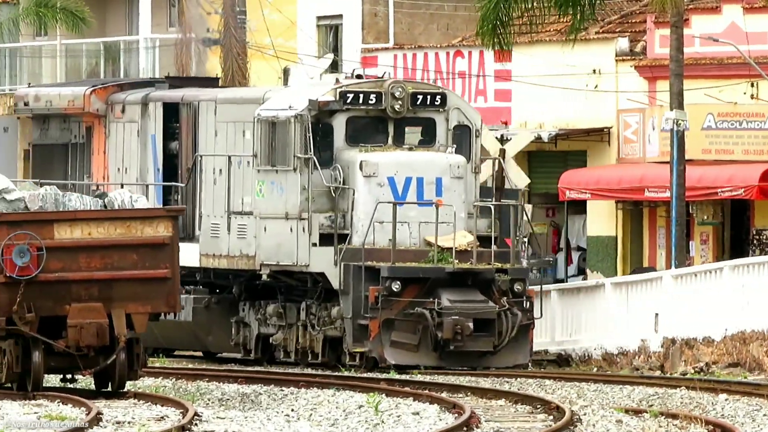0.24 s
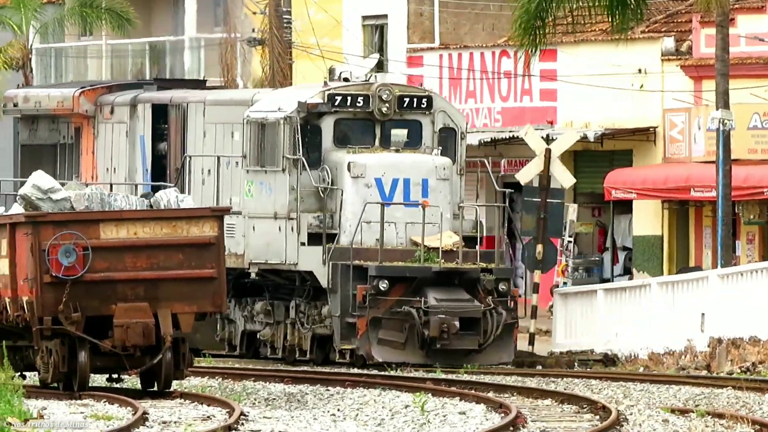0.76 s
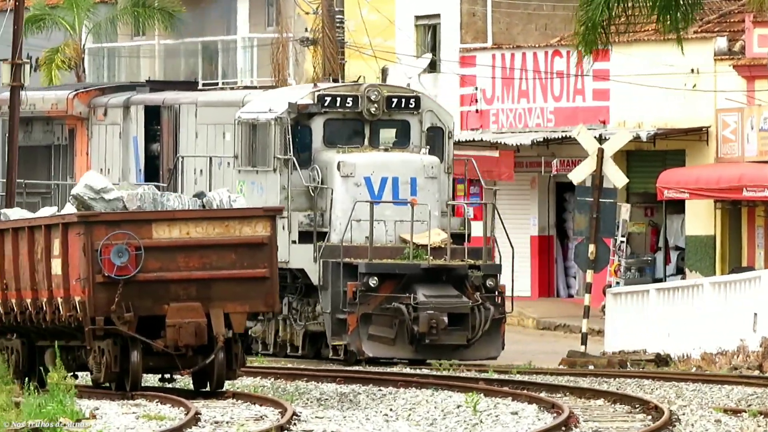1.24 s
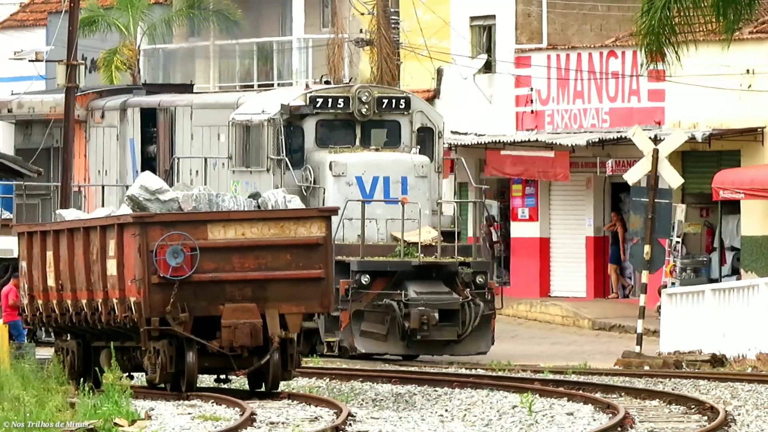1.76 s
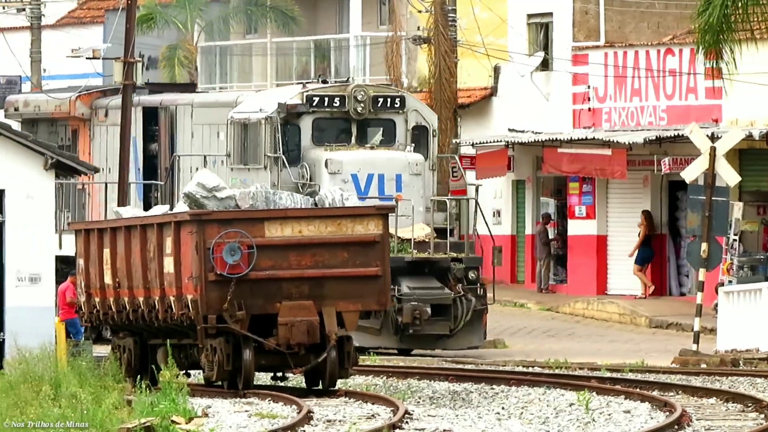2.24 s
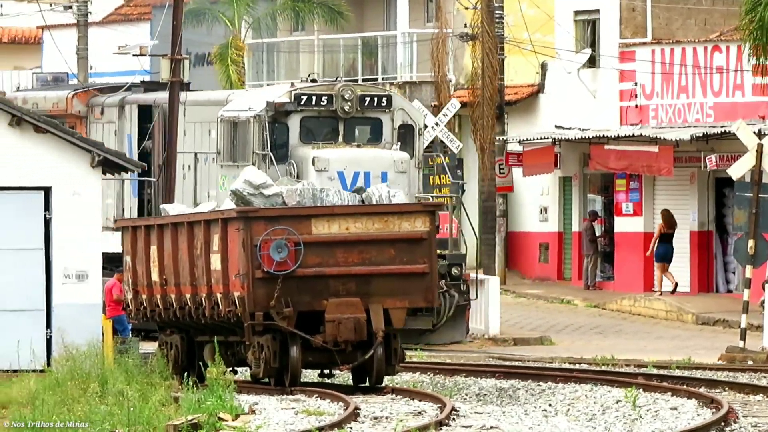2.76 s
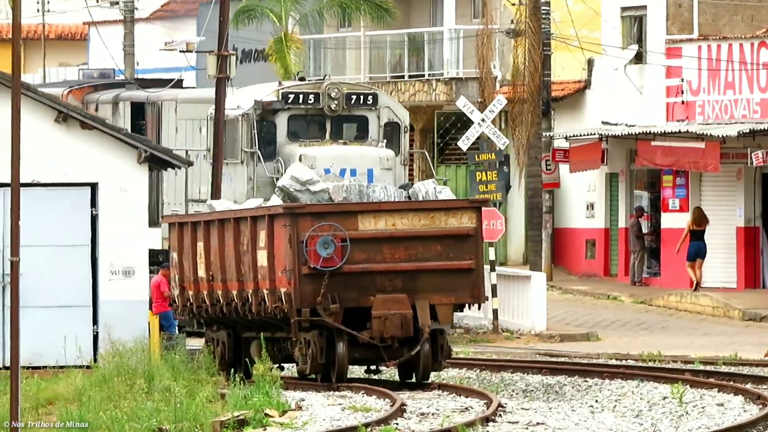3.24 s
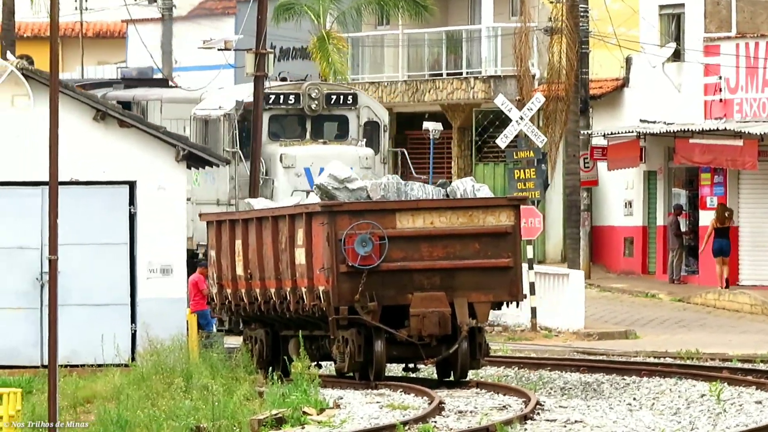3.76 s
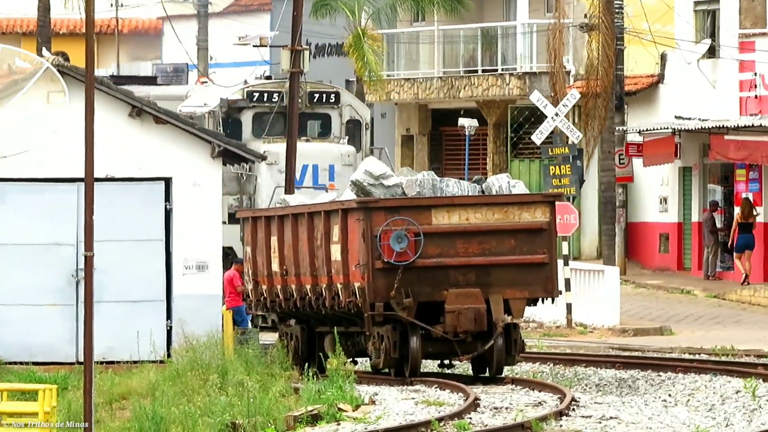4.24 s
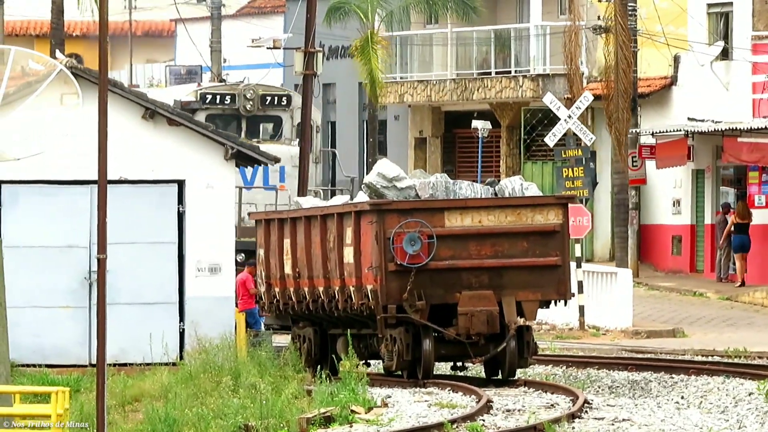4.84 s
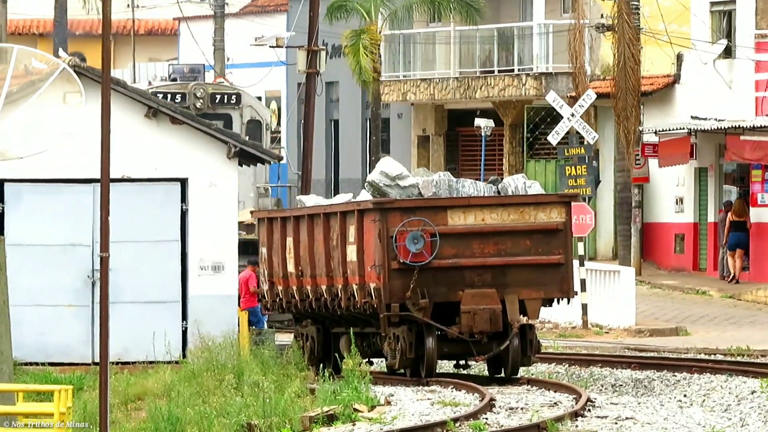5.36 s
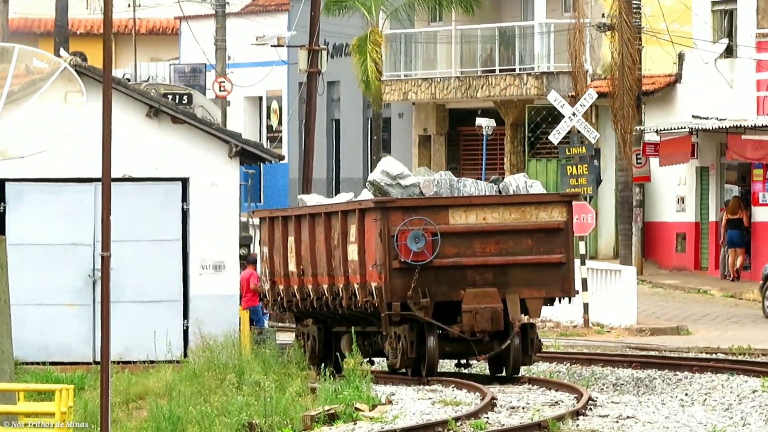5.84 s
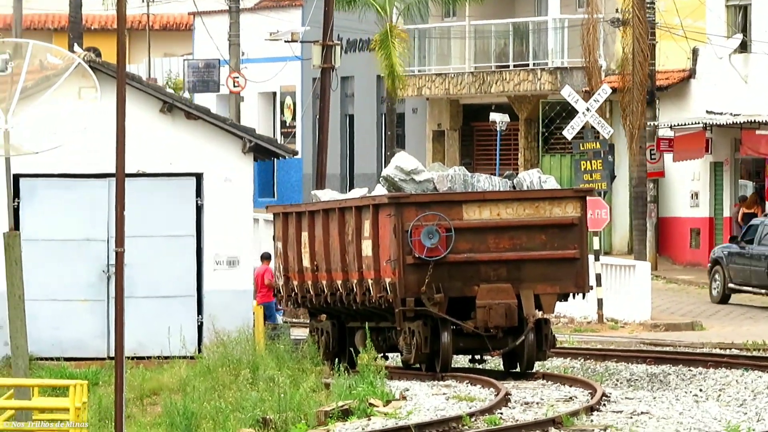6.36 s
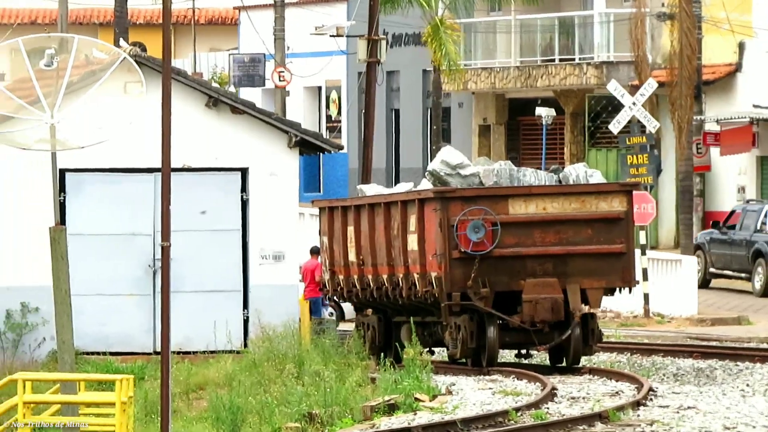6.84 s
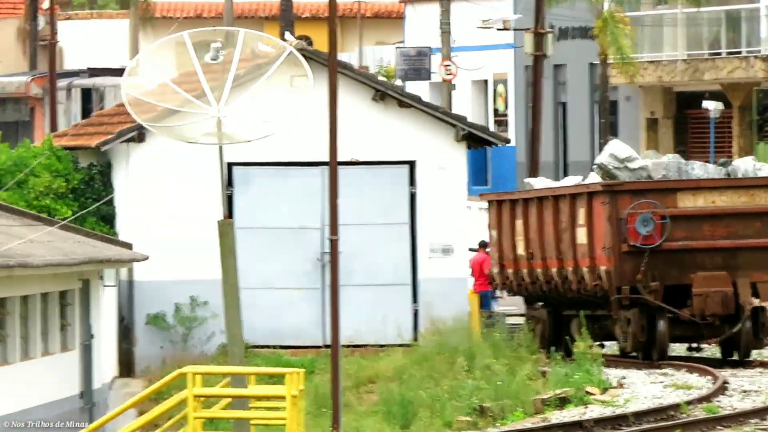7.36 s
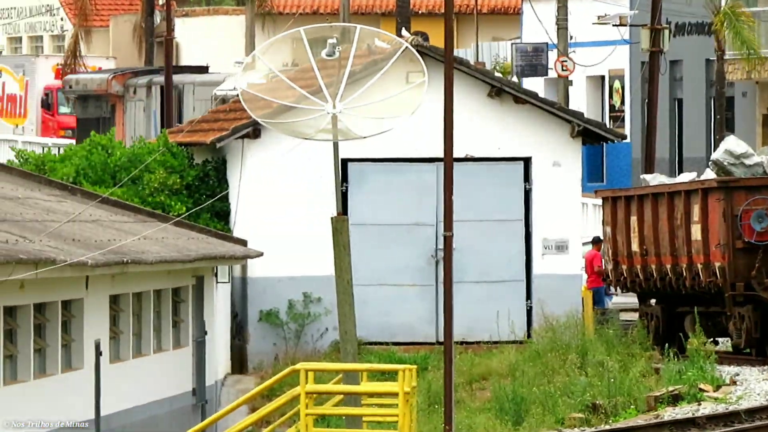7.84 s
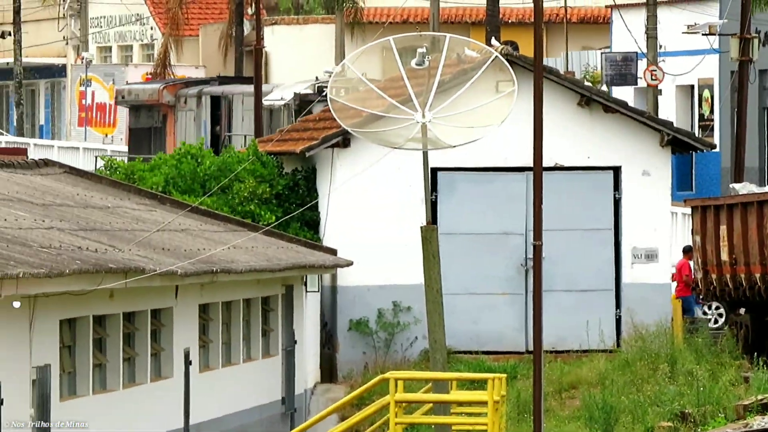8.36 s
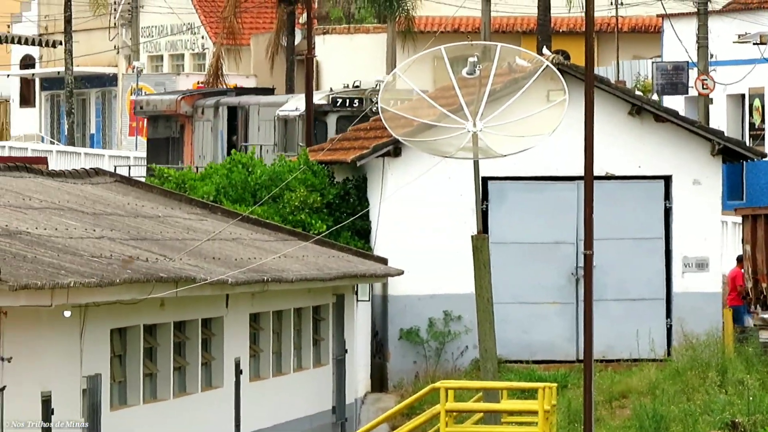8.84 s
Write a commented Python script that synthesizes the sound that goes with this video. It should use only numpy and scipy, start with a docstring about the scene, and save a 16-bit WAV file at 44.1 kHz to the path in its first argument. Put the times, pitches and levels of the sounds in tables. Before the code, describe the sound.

Small birds chirp over a slow diesel freight train, its throbbing drone and metallic rolling giving way to a thin wheel squeal.

```python
"""A big diesel locomotive hauls freight slowly round a curve in a town street. From the start its
exhaust drones in orders of the engine cycle over rumble and rolling roar, while small birds chirp and
whistle, mostly on the left. From 5.5 s a wheel flange squeals thinly. From 6.4 s the engine passes
behind a shed and throttles back, and a car accelerates further off."""
import sys
import numpy as np
from scipy import signal
from scipy.fft import rfft, irfft
from scipy.io import wavfile
from scipy.ndimage import uniform_filter1d

SR = 44100
rng = np.random.default_rng(int(sys.argv[2]) if len(sys.argv) > 2 else 0)


def pcm_store(signal):
    """Save signal as 16-bit PCM."""
    levels = np.round(np.clip(np.atleast_2d(signal), -1, 1) * 32767)
    wavfile.write(sys.argv[1], SR, levels.astype(np.int16).T)


N = 401310
TIME_S = np.arange(N) / SR

# engine passing house fronts: time_s, level_db, wall_echo_ms, ground_echo_ms, low_orders_db
ENGINE_PATH = [(0.2, -1, 32.4, 4.3, 0), (0.6, -2.5, 29.8, 2.77, -1), (1.0, 0, 26.7, 3.5, -1.5),
               (1.4, 3, 28.1, 4.07, -8), (1.8, 0, 27.4, 3.24, -4), (2.2, -3.5, 27.4, 2.55, -11.5),
               (2.6, -3, 26.2, 2.9, -12), (3.0, -1.5, 25.3, 3.55, -11), (3.4, -0.5, 23.9, 3.46, -15),
               (3.8, 0.5, 21.4, 4.03, -7.5), (4.2, -7.5, 21.2, 2.85, -0.5), (4.6, -2, 23.2, 3.4, -1.5),
               (5.0, -6, 23.9, 3.2, 3), (5.4, -3.4, 24.6, 2.68, 1.5), (5.8, -7, 23, 2.13, 0),
               (6.0, -7, 23.2, 3.1, 2.5), (6.1, -1.5, 23.7, 3.3, 2.5), (6.75, -7, 20.2, 2.5, -2.5),
               (6.9, -7.5, 33, 4.45, -6), (7.4, -4, 35, 5, -9), (7.7, -18, 25.6, 5.4, 14),
               (8.2, -20.5, 18.5, 4.3, 11.5), (8.5, -21, 30.5, 3.1, 7), (9.1, -19.5, 28, 2.1, 6)]
# four-stroke cycle: time_s, rate_hz
ENGINE_CYCLE = [(0, 5.882), (6.65, 5.882), (7.05, 5.6), (7.5, 5.12), (8.3, 4.9), (9.1, 4.8)]
# puff shape, as phase about the loudest order: time_s, lead_turns_per_order, smear_turns_per_order_sq
PUFF_SHAPE = [(0, -.073, .203), (2.1, -.073, .203), (2.5, .06, .105), (2.9, .11, .105), (3.4, -.03, .21),
              (4.25, 0, .23), (5.1, .08, .17), (5.7, -.225, .175), (9.1, -.225, .175)]
# exhaust tones, both tables: cycle_multiple, level_db
STRONG_ORDERS = [(11, -28.5), (12, -28), (13, -25.5), (14, -30), (15, -33), (16, -51), (17, -24), (18, -40),
                 (19, -18.5), (20, -20), (21, -27.5)]
WEAK_ORDERS = [(5, -37), (7, -45), (8, -52.5), (9, -32), (10, -33.5), (22, -42), (23, -56.5), (24, -55),
               (25, -46.5), (26, -45.5), (27, -54.5), (28, -51), (29, -46), (30, -46.5), (31, -44.5),
               (32, -51), (33, -33.5), (34, -45), (35, -43.5), (36, -44.5), (37, -57), (38, -59), (39, -48),
               (40, -48.5), (45, -43), (46, -48.5), (50, -48)]


def exhaust():
    """Sines on multiples of the engine cycle; neighbours beat, moving echoes cancel some in turn."""
    step = 20   # built at SR / step
    loudest_order, soften_db_per_hz, tilt_db_per_order_s = 19, 24, .002
    level_db, wall_ms, ground_ms, low_db = (c[::step] for c in in_time(ENGINE_PATH))
    lead, smear = (c[::step] for c in in_time(PUFF_SHAPE))
    cycle_hz = in_time(ENGINE_CYCLE)[0]
    cycle_rad, cycle_hz = phase(cycle_hz)[::step], cycle_hz[::step]
    tilt_db = tilt_db_per_order_s * (TIME_S[::step] - N / SR / 2)
    throttle_db = -.5 - soften_db_per_hz * (cycle_hz[0] - cycle_hz)
    orders = [(k, db + low_db * (k <= 13) + 1.2 * drift(5.5)[::step]) for k, db in STRONG_ORDERS]
    orders += [(k, db + throttle_db + k * tilt_db + 2.5 * drift(1.2)[::step]) for k, db in WEAK_ORDERS]
    out = 0
    for i, (k, db) in enumerate(orders):
        offset = k - loudest_order
        shift_rad = .03 * offset * rng.normal() + .2 * drift(.5)[::step]
        if i < len(STRONG_ORDERS):
            rad_per_ms = 2 * np.pi * k * cycle_hz / 1000
            wall, ground = .5 * np.exp(1j * rad_per_ms * wall_ms), .8 * np.exp(1j * rad_per_ms * ground_ms)
            path_gain = np.abs(1 + wall + ground)
            puff_rad = 2 * np.pi * (lead * offset + smear * offset ** 2)
            shift_rad += puff_rad[0] if k <= 15 else puff_rad
        else:   # many paths: steady gain, random phase
            path_gain, shift_rad = .85, 2 * np.pi * rng.random()
        out += np.sqrt(2) * from_db(level_db + db) * path_gain * np.cos(k * cycle_rad + shift_rad)
    return signal.resample_poly(out, step, 1)[:N]


# rumble spectrum: freq_hz, density_db
RUMBLE_SPECTRUM = [(30, -29), (45, -13.5), (85, -7), (106, -9), (130, -8.5), (161, -11), (273, -19.5),
                   (348, -29), (500, -29.5), (650, -61), (1100, -120)]
# rumble envelope: time_s, level_db
RUMBLE_LEVEL = [(0, -25), (2, -25), (3.3, -26.5), (4.5, -28), (6, -29), (6.8, -31), (7.4, -36), (8.2, -31),
                (9.1, -32.5)]


def rumble(chug_db=3.5, lead_turns=.15):
    """Low engine noise that swells once a cycle."""
    swell_db = chug_db * np.cos(phase(in_time(ENGINE_CYCLE)[0]) + 2 * np.pi * lead_turns)
    gain = from_db(in_time(RUMBLE_LEVEL)[0] + swell_db)
    return gain * noise_field(RUMBLE_SPECTRUM, flicker_db=.5, rate_hz=8.4)


# rolling roar: time_s, level_db, centre_hz
ROAR = [(0, -38, 1530), (.25, -38, 1760), (1.3, -39, 1680), (1.62, -38.5, 1860), (2.08, -35.5, 1600),
        (2.4, -37.5, 1476), (2.8, -40.5, 1880), (3.25, -37.5, 1690), (3.45, -40.5, 1840),
        (3.7, -37.5, 1730), (4.4, -36.5, 1850), (4.94, -35, 1770), (5.35, -38, 1830), (5.7, -41, 1810),
        (6.03, -36.5, 1910), (7, -47, 1600), (8.3, -79, 1790), (9.1, -42, 1640)]


def rolling(mode_width_hz=24, swell_db=5, flicker_db=3.5):
    """Rough contact drives wheel and rail modes; those near a wandering centre ring up most."""
    level_db, centre_hz = in_time(ROAR)
    rattle_db = 1.2 * drift(30)
    out = 0
    for hz in np.geomspace(1330, 2070, 16):
        mid, side = signal.lfilter([1, 0, -1], mode_poles(hz, mode_width_hz), rng.standard_normal((2, N)))
        nearness = np.exp(-((centre_hz - hz) / 220) ** 2)
        gain = from_db(swell_db * nearness + flicker_db * drift(7.6) + rattle_db)
        out += gain * (mid + .08 * side * [[1], [-1]])
    out = butterworth(out, 4, [1200, 2300], "band")
    running_rms = np.sqrt(uniform_filter1d(np.mean(out ** 2, axis=0), SR // 3))
    return from_db(level_db) * out / running_rms


# single wheels ringing out: start_s, pitch_hz, level_db, decay_s
WHEEL_RINGS = [(0.023, 1470, -34, 0.063), (1.457, 1980, -38, 0.28), (1.861, 1440, -38, 0.22),
               (2.029, 1684, -36, 0.11), (2.283, 1355, -44, 0.24), (4.37, 2000, -39, 0.083),
               (4.67, 1480, -38, 0.32), (4.874, 1980, -34, 0.086)]


def wheel_rings(width_hz=90):
    """Rubbing noise in one narrow wheel mode at a time: quick swell, slower fall."""
    out = np.zeros(N)
    for start_s, hz, db, decay_s in WHEEL_RINGS:
        age = np.arange(int(.6 * SR)) / SR / decay_s
        tone = rms_one(signal.lfilter([1], mode_poles(hz, width_hz), rng.standard_normal(len(age))))
        envelope = np.minimum(age / .15, 1) * np.exp(-age ** 2)
        out[int(start_s * SR):][:len(age)] += from_db(db) * envelope * tone
    return out


def ground_shake():
    """The train's weight shakes the ground steadily."""
    return from_db(-34) * rms_one(butterworth(rng.standard_normal(N), 2, (7.6, 46), "band"))


# engine rush spectrum: freq_hz, density_db
RUSH_SPECTRUM = [(450, -12), (700, -20.5), (1100, 5), (1600, 4), (2400, 4.5), (3200, 3.5), (5300, -8.5),
                 (7900, -24), (15000, -45)]


def rush(shed_s=6.4, shed_db_per_s=8 / 5.3):
    """Engine hiss and clinking iron follow the roar's level in part; the shed screens them off."""
    roar_swing_db = in_time(ROAR)[0] + 37
    shed_db = shed_db_per_s * np.maximum(TIME_S - shed_s, 0)
    hiss = noise_field(RUSH_SPECTRUM, flicker_db=1.25, rate_hz=6)
    return from_db(-40 + .64 * roar_swing_db - shed_db) * (hiss + from_db(-8) * clinks())


def clinks(knocks_per_s=160, t60_s=.05):
    """Chance knocks ring briefly in the modes of loose iron on the wagons; rms 1."""
    knocks = from_db(3 * np.minimum(rng.exponential(1, N), 4)) * (rng.random(N) < knocks_per_s / SR)
    struck_mode = rng.integers(0, 24, N)
    modes_hz = np.geomspace(1350, 4200, 24) * rng.uniform(.98, 1.02, 24)
    width_hz = np.log(1000) / (np.pi * t60_s)
    out = 0
    for k, hz in enumerate(modes_hz):
        gain = np.sin(2 * np.pi * hz / SR)
        ring = signal.lfilter([gain], mode_poles(hz, width_hz), knocks * (struck_mode == k) + 1e-18)
        out += signal.lfilter([gain], mode_poles(hz, 3 * width_hz), ring)   # softens the attack
    return rms_one(out)


# flange tone: time_s, pitch_hz, level_db
SQUEAL = [(5.5, 1690, -70), (5.8, 1690, -48), (6.1, 1672, -45), (6.6, 1664, -45), (6.9, 1683, -44),
          (7.4, 1695, -42.5), (8.75, 1696, -41), (8.93, 1667, -42), (9.1, 1679, -41)]
# flange letting go: centre_s, half_width_s
SQUEAL_GAPS = [(7.047, 0.052), (7.18, 0.033), (7.5, 0.025), (7.855, 0.015), (7.935, 0.016), (8.062, 0.016),
               (8.158, 0.011), (8.367, 0.034), (8.642, 0.056)]


def squeal(gap_db=16):
    """A flange sings unsteadily on a wheel mode, with a fainter neighbour mode above."""
    hz, level_db = in_time(SQUEAL)
    for centre_s, half_width_s in SQUEAL_GAPS:
        level_db -= gap_db * np.exp(-((TIME_S - centre_s) / half_width_s) ** 2)
    main = np.sin(phase(hz + 4 * drift(25)))
    upper = from_db(-12 + 4 * drift(6)) * np.sin(phase(1762 + 5 * drift(20)))
    return np.sqrt(2) * from_db(level_db + 2.5 * drift(25)) * (main + upper)


# near bird's notes: start_s, length_s, first_hz, middle_hz, last_hz, level_db
SONG_NOTES = [(0.798, 0.031, 5750, 5680, 5480, -39), (0.847, 0.031, 5400, 5320, 5030, -37),
              (0.907, 0.05, 4750, 4420, 4900, -43.5), (0.995, 0.022, 4250, 4480, 4700, -41.5),
              (1.404, 0.031, 5590, 5670, 5370, -43), (1.435, 0.03, 5870, 5960, 6150, -54),
              (1.454, 0.03, 5300, 5250, 4900, -38), (1.511, 0.033, 4840, 4580, 4700, -39),
              (1.587, 0.024, 3960, 4270, 4540, -42), (6.33, .09, 5900, 6100, 6450, -61),
              (7.532, 0.12, 7500, 6150, 5300, -53), (7.436, 0.078, 5900, 6900, 7500, -61),
              (8.504, 0.034, 6750, 6800, 6900, -50), (8.886, 0.11, 7000, 6170, 5540, -49.5),
              (9.056, 0.06, 6600, 6850, 6900, -52)]
# its long whistles, one list each: time_s, pitch_hz, level_db
LONG_WHISTLES = [
    [(6.385, 5350, -62), (6.43, 6050, -59), (6.47, 6280, -57), (6.53, 5900, -52)],
    [(7.82, 5230, -76), (7.864, 5260, -44.5), (7.988, 5490, -44.5), (8.016, 5500, -52)],
    [(8.05, 5495, -56), (8.114, 6040, -44), (8.154, 6300, -50), (8.222, 6960, -45), (8.27, 6900, -49),
     (8.33, 5850, -44), (8.39, 4680, -39.5), (8.45, 4620, -67)],
    [(8.51, 5320, -54), (8.556, 5190, -42), (8.614, 4770, -39.5), (8.668, 4970, -43.5), (8.69, 4800, -60),
     (8.768, 5040, -65)],
    [(8.77, 4040, -59), (8.816, 3510, -40.5), (8.87, 3460, -53), (8.888, 3380, -41), (8.902, 3330, -50),
     (8.918, 3270, -36), (8.94, 3270, -60)],
]


def near_bird():
    """Clear gliding whistles, the shortest hooked at both ends."""
    notes = [note(start_s, length_s, hz, db) for start_s, length_s, *hz, db in SONG_NOTES]
    return whistle(notes + LONG_WHISTLES, flutter_db=2, waver=.006, fading_db=3.5, hook_depth=.3)


# chirps further off: start_s, length_s, first_hz, last_hz, level_db
RASPY_CHIRPS = [(0.401, 0.042, 5940, 5620, -45.5), (0.601, 0.043, 3940, 5600, -44.5),
                (0.638, 0.034, 3330, 4150, -37), (0.67, .025, 3750, 3330, -36),
                (0.701, 0.038, 3160, 2850, -39), (0.839, 0.027, 3090, 3070, -41),
                (1.121, 0.064, 4220, 5100, -43.5), (1.193, 0.045, 3220, 3090, -41.5),
                (1.649, 0.049, 2970, 2780, -49), (2.056, 0.023, 5100, 4800, -44),
                (1.835, 0.025, 5550, 5370, -53.5), (2.19, 0.059, 5330, 5960, -49),
                (2.379, 0.022, 5900, 5850, -45.5), (2.68, 0.024, 5470, 5380, -44.5),
                (2.902, 0.04, 4600, 4900, -42), (2.947, 0.036, 4750, 4210, -42),
                (2.961, 0.022, 6100, 5770, -43.5), (2.987, 0.049, 3550, 3380, -44),
                (3.19, .032, 5240, 5900, -48), (3.266, 0.041, 3800, 3600, -41),
                (3.274, 0.023, 5740, 5850, -43.5), (3.349, 0.018, 4400, 4650, -43),
                (3.414, 0.027, 2976, 3180, -42), (3.442, 0.033, 5680, 5100, -47.5),
                (3.482, 0.021, 7260, 6770, -51.5), (3.502, 0.028, 5270, 5060, -46),
                (3.823, 0.046, 4020, 3770, -46), (3.964, 0.017, 5600, 5260, -47),
                (4.28, .03, 7100, 7900, -59), (4.308, 0.051, 4900, 5160, -44),
                (4.335, .04, 4500, 4290, -41.5), (4.35, 0.026, 8600, 8400, -55),
                (5.185, 0.045, 4970, 4460, -43), (5.488, .026, 4030, 4130, -48.5),
                (5.723, 0.018, 5350, 5840, -51), (5.742, 0.034, 7540, 7040, -55),
                (5.743, 0.039, 3750, 3670, -41), (6.177, 0.02, 5920, 5960, -54),
                (6.313, 0.027, 4700, 4500, -44), (6.392, 0.036, 4080, 3060, -39),
                (7.062, 0.051, 4500, 4660, -49), (7.497, 0.024, 5600, 5420, -54),
                (7.5, .02, 5000, 4850, -51), (7.126, 0.044, 3200, 3450, -44),
                (7.945, 0.042, 4530, 3000, -39), (7.996, 0.028, 2940, 3130, -43),
                (8.279, 0.033, 4240, 4430, -48.5), (8.333, 0.034, 3000, 3480, -49),
                (8.53, .054, 4350, 4290, -46), (8.554, .05, 3950, 2880, -50),
                (8.818, 0.035, 4530, 4470, -42), (.68, .02, 5700, 5400, -54), (1.04, .02, 5850, 5850, -52),
                (1.135, 0.023, 4140, 3800, -44), (2.32, .02, 5400, 5640, -50),
                (2.585, .03, 5050, 5350, -52), (2.84, .03, 5400, 5000, -56), (3.39, .02, 5500, 5680, -54),
                (3.53, .02, 6050, 6350, -54), (4.51, 0.032, 5900, 6100, -52), (5.05, .03, 5500, 5450, -56),
                (6.04, 0.022, 5450, 5460, -57), (6.49, .025, 5450, 5430, -54)]


def raspy_birds(arch_ratio=1.025, rasp_hz=220, rasp_share=.3):
    """Slightly arched chirps, made hoarse by fast noise on their amplitude."""
    notes = [note(start_s, length_s, [first_hz, arch_ratio * (first_hz + last_hz) / 2, last_hz], db)
             for start_s, length_s, first_hz, last_hz, db in RASPY_CHIRPS]
    voice = whistle(notes, flutter_db=2, waver=.018, fading_db=1, hook_depth=.05)
    rasp = rms_one(butterworth(rng.standard_normal(N), 2, rasp_hz, "low"))
    return voice * (np.sqrt(1 - rasp_share) + np.sqrt(rasp_share) * rasp)


def far_birds(chirps_per_s=60, centre_hz=5500):
    """Two groups of faint short notes at chance moments, pitches and slopes; fainter after 6.5 s."""
    notes = []
    for when, pitch_a, pitch_b, slope, length, loudness in rng.random((int(chirps_per_s * N / SR), 6)):
        start_s = when * (N / SR - .1)
        octaves = .36 * (pitch_a + pitch_b - 1)
        hz = centre_hz * 2 ** octaves
        bend = 1 + .2 * (slope - .55)
        level_db = -60 + 6 * loudness - 12 * octaves - 5 * (start_s > 6.5)
        notes.append(note(start_s, .01 + .02 * length, [hz, hz * bend], level_db))
    return [whistle(group, flutter_db=2.5, waver=.008, fading_db=4, hook_depth=.1)
            for group in (notes[::2], notes[1::2])]


# car engine: time_s, firing_hz, second_harmonic_db, third_harmonic_db
CAR = [(6.6, 67.3, -56, -59), (7.0, 69.94, -54, -43.5), (7.5, 72.2, -40, -38.5), (7.9, 77.9, -45, -44),
       (8.4, 81.2, -37, -41), (8.7, 81.7, -37.5, -36.5), (8.95, 81, -48, -40.5), (9.1, 81, -57, -53)]


def car():
    """Two harmonics of a rising firing rate, broken up by distance."""
    hz, second_db, third_db = in_time(CAR)
    firing_rad = phase(hz * (1 + .005 * drift(9)))
    second = from_db(second_db + 2 * drift(9)) * np.sin(2 * firing_rad)
    third = from_db(third_db + 2 * drift(9)) * np.sin(3 * firing_rad)
    return np.sqrt(2) * (second + third)


# town spectrum: freq_hz, density_db
TOWN_SPECTRUM = [(150, -34.5), (250, 0), (390, -6.5), (520, -8.5), (720, -7.5), (845, -8), (1430, -13.5),
                 (1900, -15), (5100, -27), (8800, -43), (10100, -45), (15000, -58.5)]
# town envelope: time_s, level_db
TOWN_LEVEL = [(0, -38), (1.7, -38), (2.2, -39.5), (3.8, -38.5), (4.7, -38.5), (6, -38.5), (7, -38.5),
              (8.3, -37), (9.1, -38)]


def town():
    """A nearly steady wash of town noise."""
    return from_db(in_time(TOWN_LEVEL)[0]) * noise_field(TOWN_SPECTRUM, flicker_db=1.5, rate_hz=2.9)


# street response: freq_hz, gain_db
STREET_COLOUR = [(480, -1), (600, 3.5), (690, 0), (755, -5), (840, 2.5), (950, 0), (1130, -3), (1300, 0),
                 (2150, -1), (2300, 2), (2450, .5), (2580, -2), (2800, 0), (2950, -1), (3050, 1.5),
                 (3200, -1), (3400, 0), (3900, 1), (4200, 0)]
# left-right likeness: freq_hz, correlation
STEREO_CORRELATION = [(30, 0.97), (60, 0.97), (130, 0.97), (300, 0.95), (1400, 0.97), (2800, 0.83),
                      (4500, 0.74), (6000, 0.2), (9000, .1), (14000, 0.65)]
# balance: freq_hz, left_minus_right_db
STEREO_BALANCE = [(60, 3.5), (180, 1), (400, 0.5), (1500, 2.5), (5000, 0), (10000, 0)]


def noise_field(spectrum, flicker_db, rate_hz):
    """Street-coloured stereo noise, flickering in bands two thirds of an octave apart; rms 1."""
    hz = np.maximum(np.arange(N // 2 + 1) * SR / N, 1)
    low_hz, high_hz = spectrum[0][0], spectrum[-1][0]
    colour = from_db(at_hz(spectrum, hz) + at_hz(STREET_COLOUR, hz))
    mid, side = rfft(rng.standard_normal((2, N))) * colour
    correlation, lean = at_hz(STEREO_CORRELATION, hz), from_db(at_hz(STEREO_BALANCE, hz) / 2)
    mid, side = np.sqrt(1 + correlation) * mid, np.sqrt(1 - correlation) * side
    pair = np.array([(mid + side) * lean, (mid - side) / lean])
    pair[:, (hz < low_hz) | (hz > high_hz)] = 0
    thirds = 3 * np.log2(hz / low_hz)
    out, common = 0, drift(rate_hz / 3)
    for centre in range(0, int(thirds[hz <= high_hz][-1]) + 2, 2):
        window = np.cos(np.pi / 2 * np.clip((thirds - centre) / 2, -1, 1)) ** 2
        out += irfft(pair * window, N) * from_db(flicker_db * (.4 * common + drift(rate_hz)))
    return rms_one(out)


def note(start_s, length_s, pitches_hz, level_db):
    """A note that swells in, glides through its pitches and dies: rows of time_s, pitch_hz, level_db."""
    edge_s = max(.0026, .064 * length_s)
    knots_s = np.linspace(0, length_s, len(pitches_hz))
    t = np.unique(np.r_[knots_s, edge_s, length_s - edge_s])
    edge_db = 12 * np.clip(1 - np.minimum(t, length_s - t) / edge_s, 0, 1)
    return list(zip(start_s + t, np.interp(t, knots_s, pitches_hz), level_db - edge_db))


def whistle(notes, flutter_db, waver, fading_db, hook_depth):
    """Fluttering sine notes; short ones start and end under pitch, long ones fade in and out by chance."""
    out, flutter, warble, fading = np.zeros(N), drift(45), drift(100), drift(31)
    for rows in notes:
        time_s, hz, level_db = np.transpose(rows)
        at = np.arange(max(int(time_s[0] * SR), 0), min(int(time_s[-1] * SR), N))
        edge_s = np.minimum(at - at[0], at[-1] - at) / SR
        short = time_s[-1] - time_s[0] < .045
        hook = hook_depth * short * np.exp(-edge_s / .0013)
        pitch_hz = np.interp(at / SR, time_s, hz) * (1 + waver * warble[at]) * (1 - hook)
        wobble_db = flutter_db * flutter[at] + fading_db * (not short) * fading[at]
        gain = from_db(np.interp(at / SR, time_s, level_db) + wobble_db) * np.minimum(edge_s / .00082, 1)
        out[at] += np.sqrt(2) * gain * np.sin(phase(pitch_hz))
    return out


def wall_echoes(x, wet_db, t60_s):
    """Adds scattered echoes off walls: a dying noise tail on each side after a short gap."""
    t = np.arange(int(.4 * SR)) / SR
    tail = rng.standard_normal((2, len(t))) * from_db(-60 * t / t60_s) * (t > .012)
    tail /= np.sqrt(np.sum(tail ** 2) / 2)
    return x + from_db(wet_db) * signal.fftconvolve(x, tail, axes=1)[:, :N]


def placed(x, pan_db, lead_samples):
    """Stereo by level and arrival time; positive favours the left."""
    late = np.interp(np.arange(N) - abs(lead_samples), np.arange(N), x)
    pair = [x, late] if lead_samples > 0 else [late, x]
    return np.array(pair) * from_db([[pan_db / 2], [-pan_db / 2]])


def drift(rate_hz):
    """Slow random wander: low-passed noise at every 100th sample; rms 1."""
    r = np.exp(-200 * np.pi * rate_hz / SR)
    slow = signal.lfilter([1], [1, -2 * r, r * r], rng.standard_normal(N // 100 + 802))[800:]
    return np.interp(np.arange(N) / 100, np.arange(len(slow)), rms_one(slow))


def mode_poles(hz, width_hz):
    """Filter denominator of one damped mode."""
    r = np.exp(-np.pi * width_hz / SR)
    return [1, -2 * r * np.cos(2 * np.pi * hz / SR), r * r]


def butterworth(x, order, hz, kind):
    """Causal filter with a flat passband."""
    return signal.sosfilt(signal.butter(order, hz, kind, fs=SR, output="sos"), x)


def in_time(rows):
    """A table's columns after time_s, sample by sample."""
    time_s, *columns = np.transpose(rows)
    return [np.interp(TIME_S, time_s, column) for column in columns]


def at_hz(rows, hz):
    """A curve read on a log-frequency axis."""
    knots_hz, values = np.transpose(rows)
    return np.interp(np.log(hz), np.log(knots_hz), values)


def phase(hz):
    """Running phase in radians."""
    return 2 * np.pi * np.cumsum(hz) / SR


def from_db(db):
    """Amplitude gain."""
    return 10 ** (np.asarray(db) / 20)


def rms_one(x):
    """Scaled to rms 1."""
    return x / np.sqrt(np.mean(x ** 2) + 1e-20)


def scene():
    """Train, birds and street, in stereo."""
    train = exhaust() + rumble() + rolling() + wheel_rings() + ground_shake() + rush()
    background = town() + car()
    far_left, far_right = far_birds()
    song = placed(near_bird(), pan_db=2.5, lead_samples=2)
    chirps = placed(raspy_birds() + far_left, pan_db=2.5, lead_samples=2)
    chirps += placed(far_right, pan_db=-2.5, lead_samples=-2)
    birds = wall_echoes(song, wet_db=-9, t60_s=.3) + wall_echoes(chirps, wet_db=-7, t60_s=.2)
    return train + placed(squeal(), pan_db=-1.5, lead_samples=3.9) + birds + background


def record(dry, fade_in_s=.006, low_cut_hz=22, high_cut_hz=15800):
    """A click-free start; the lowest bass and the top are cut."""
    faded = dry * np.minimum(TIME_S / fade_in_s, 1)
    high_passed = butterworth(faded, 2, low_cut_hz, "high")
    return signal.sosfilt(signal.cheby2(12, 60, high_cut_hz, fs=SR, output="sos"), high_passed)


dry = scene()
out = record(dry)
pcm_store(out)
```